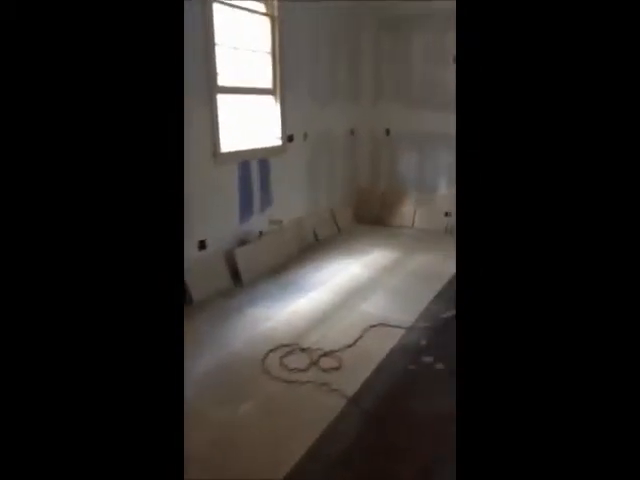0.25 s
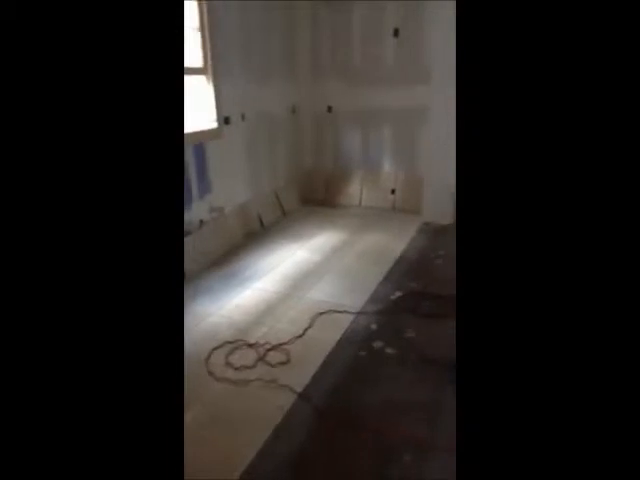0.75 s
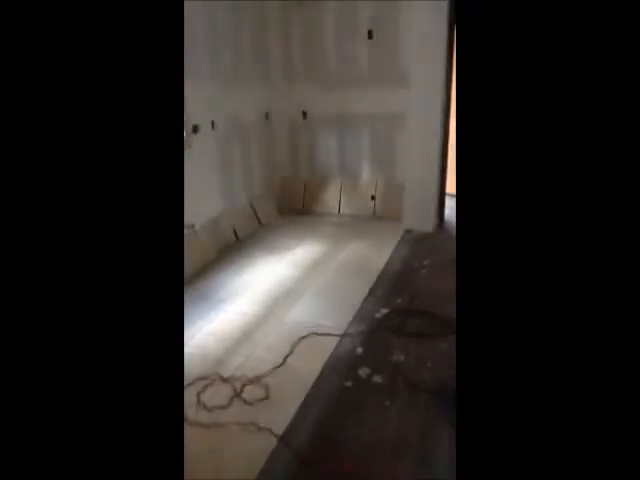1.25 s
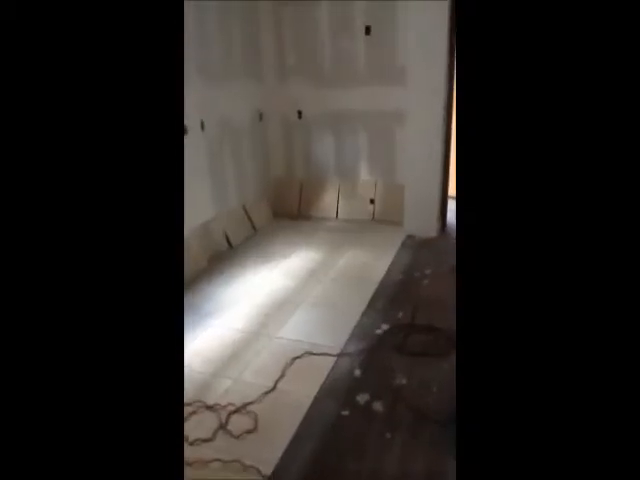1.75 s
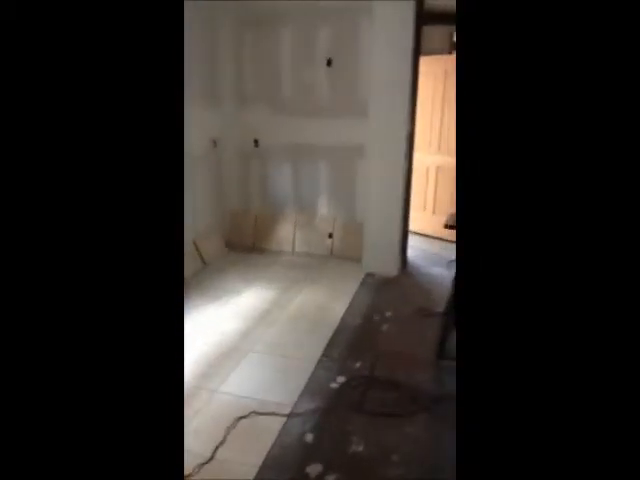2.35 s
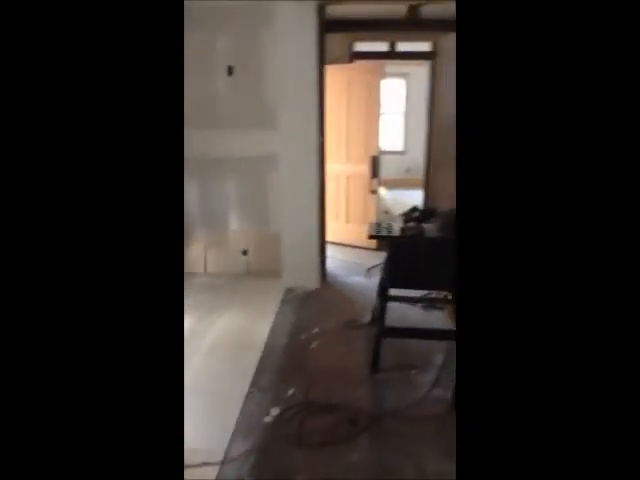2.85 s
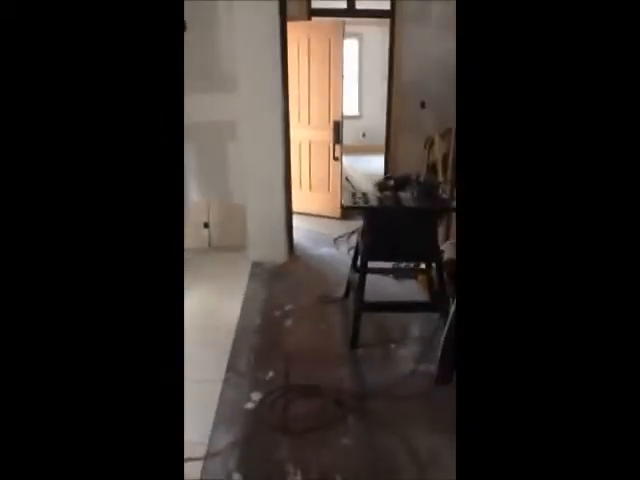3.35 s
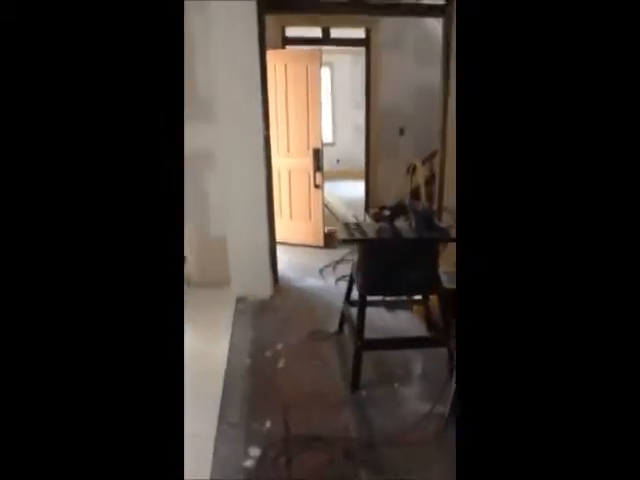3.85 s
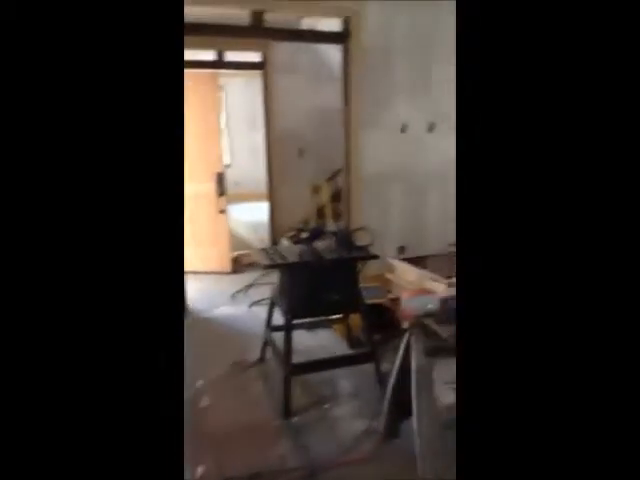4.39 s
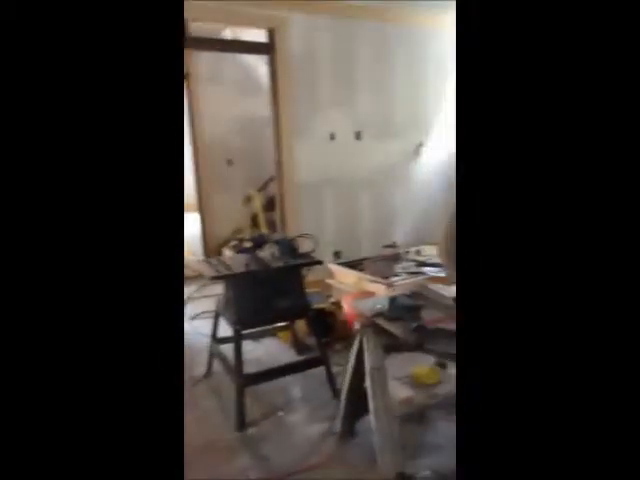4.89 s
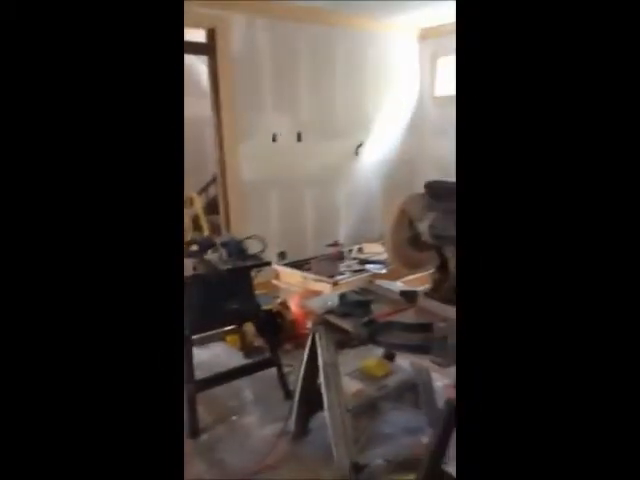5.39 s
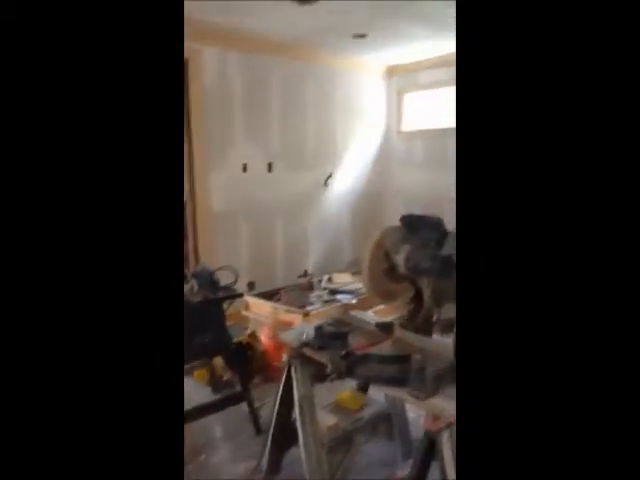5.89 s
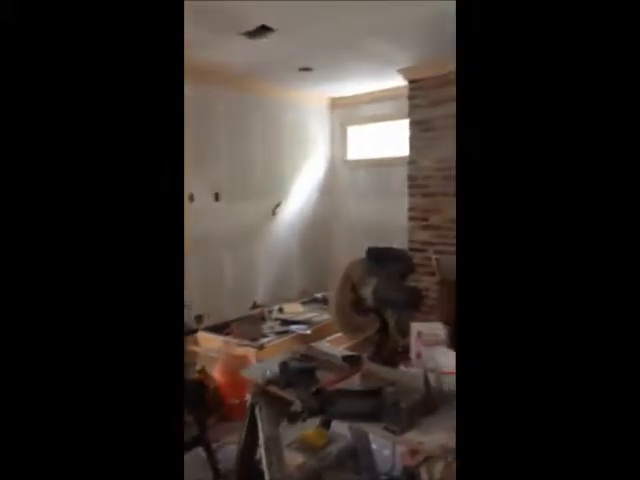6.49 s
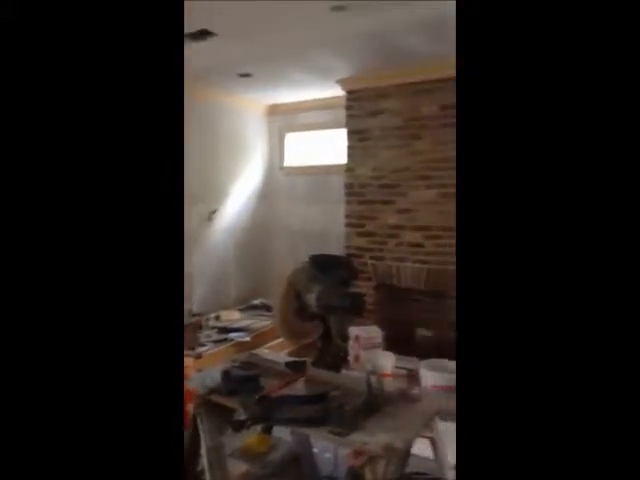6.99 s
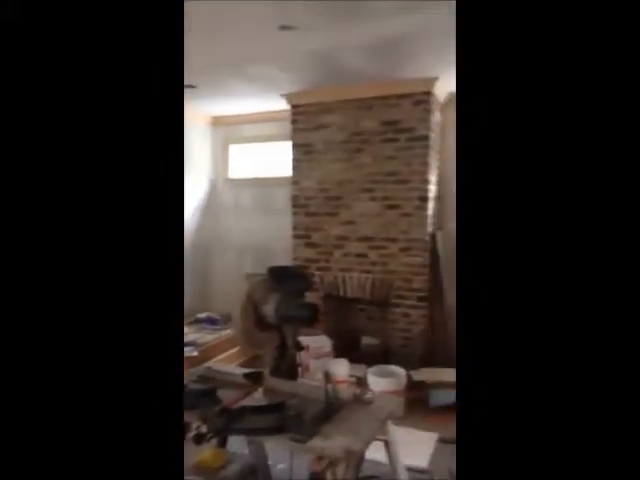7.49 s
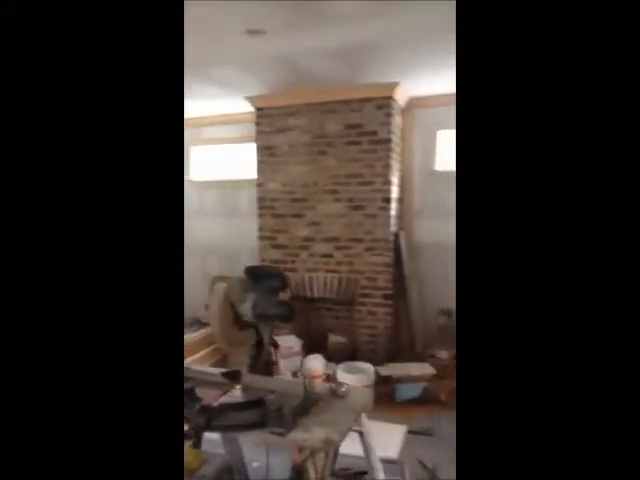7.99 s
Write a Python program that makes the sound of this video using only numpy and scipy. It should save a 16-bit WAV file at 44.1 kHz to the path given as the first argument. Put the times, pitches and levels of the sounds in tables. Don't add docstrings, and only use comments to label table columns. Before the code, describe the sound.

A bare, reverberant room heard through a phone microphone that ducks and slightly overloads on loud hits. From the start a power tool next door gives a soft, airy, geared whir, coasting down and cutting off around 1.6-1.8 s, with a faint drag until 2.3. A heavy hammer blow strikes timber at 0.4 s, a second, glancing one at 0.85. Small steel parts jingle at 1.3, then loose planks knock and bounce from 1.4 to 1.8. A plank topples dully at 2.1; a thin panel slaps with a clank at 2.23. Grit scrapes and a step fall near 2.6. A thin strip cracks brightly and splinters at 3.22. Faint board rocking follows at 3.6 and 4.5. A load drops and bounces at 5.2-5.4. From 5.8 a hollow box bumps, tools rattle weakly, and grit scrapes and snaps until 7.3. A soft step at 7.5, tiny ticks and pings near 8, over low rumble and hiss.

```python
import sys
import numpy as np
from scipy import signal
from scipy.fft import rfft, irfft, next_fast_len
from scipy.io import wavfile
from scipy.ndimage import uniform_filter1d, minimum_filter1d

SR = 44100
rng = np.random.default_rng(int(sys.argv[2]) if len(sys.argv) > 2 else 0)


def field_ratio(decibels):
    return 10 ** (np.asarray(decibels, dtype=float) / 20)


def generate_wav(sig):
    pcm = np.round(np.clip(np.atleast_2d(sig).T, -1, 1) * 32767).astype(np.int16)
    wavfile.write(sys.argv[1], SR, pcm)


N = 363384
SIZE = 45000

# centre_hz, width_hz, level_db
PLANK_MODES = [(265, 93, -3), (373, 160, -0.5), (775, 270, -11.5), (1173, 360, -5)]


def unit(x):
    return x / np.sqrt(np.mean(x ** 2) + 1e-20)


def along(points, hz):
    f, v = np.transpose(points)
    return np.interp(np.log(hz + 1), np.log(f + 1), v)


def coloured(x, gain):
    m = next_fast_len(N + 8192)
    return irfft(rfft(x, m) * gain(np.fft.rfftfreq(m, 1 / SR)), m)[:N]


def humps(modes, hz):
    return np.sqrt(1 + sum(field_ratio(db) ** 2 / (1 + (2 * (hz - c) / w) ** 2) for c, w, db in modes))


def causal(gain):
    cepstrum = irfft(np.log(gain + 1e-6))
    cepstrum[1:SIZE // 2] *= 2
    cepstrum[SIZE // 2 + 1:] = 0
    return np.exp(rfft(cepstrum))


def patchy(x, depth_db):
    z = signal.stft(x, nperseg=512)[2]
    field = uniform_filter1d(rng.standard_normal(z.shape), size=6, axis=0)
    field = uniform_filter1d(field, size=14, axis=1)
    return signal.istft(z * field_ratio(depth_db * unit(field)), nperseg=512)[1][:N]


def tail(seconds=1):
    # pitch_hz, t60_s
    room_decay = [(100, 0.76), (260, 0.43), (700, 0.79), (1840, 0.75), (4850, 0.65), (12800, 0.35)]
    hz, t, z = signal.stft(rng.standard_normal(round(seconds * SR)), SR, nperseg=256)
    fade_db = -60 * t / along(room_decay, hz)[:, None]
    x = signal.istft(z * field_ratio(fade_db), SR, nperseg=256)[1]
    return x / np.linalg.norm(x)


def add(out, s, x):
    part = out[round(s * SR):][:len(x)]
    part += x[:len(part)]


def knocks(rows, modes, note, ring_db, direct_db, wet_db, bass_db, knee_db, early_db, dull_db,
           sharp_ms, soft_ms_per_db):
    out, hz, t = np.zeros(N), np.fft.rfftfreq(SIZE, 1 / SR), np.arange(SIZE) / SR
    wood = humps([(c, w, max(db, -8) + ring_db) for c, w, db in modes], hz)
    note_hz, note_db, note_t60 = note
    hum = field_ratio(note_db - 60 * t / note_t60) * np.sin(2 * np.pi * note_hz * t)
    hum *= 1 - np.exp(-t / 0.0013)
    hardest_db = max(row[1] for row in rows)
    for s, db, mid_db, bright_db in rows:
        sizzle_db = bright_db - dull_db
        slope = [(30, bass_db - 34.0), (100, bass_db), (190, 0.4 * bass_db + 2.0), (280, -1.0),
                 (450, -0.83), (1100, mid_db + 4.0), (2000, (mid_db + bright_db) / 2 + knee_db),
                 (3500, bright_db - 2.5), (9000, sizzle_db - 2.5), (15000, sizzle_db - 7)]
        swell_ms = abs(sharp_ms + soft_ms_per_db * (hardest_db - db))
        answer = field_ratio(wet_db + early_db * np.exp(-t / 0.013)) * np.resize(tail(), SIZE) * (t < 1)
        answer *= 1 - np.exp(-t / (swell_ms / 1000 + 1e-4))
        sight = field_ratio(-2.5 * swell_ms)
        contact = np.abs(rng.standard_normal(64)) ** 3 * np.exp(-t[:64] / .0003)
        answer[:64] += field_ratio(direct_db) * sight * contact / np.linalg.norm(contact)
        blow = irfft(rfft(answer) * causal(wood * field_ratio(along(slope, hz))), SIZE)
        add(out, s + .0016, field_ratio(db) * (blow + sight * hum))
    return out


def hammer():
    # start_s, peak_db, mid_db, bright_db
    blows = [
        (0.381, -16.5, 3, 1),
        (0.387, -1.5, -3.5, -10),
    ]
    # centre_hz, width_hz, level_db
    stud = [(268, 68, 6), (373, 24, 1), (483, 80, -1), (530, 82, -0.5), (622, 15, 1), (695, 35, 3),
            (870, 46, -8), (1116, 43, -2), (1300, 20, -10.5), (1820, 37, -5.5), (1980, 24, -12),
            (2400, 30, -1), (3840, 65, -6), (5450, 72, -24), (8360, 690, 3)]
    return knocks(blows, stud, (280, 0, .15), ring_db=8.0, direct_db=34.0, wet_db=29.5, bass_db=-18.5,
                  knee_db=2.5, early_db=13.0, dull_db=19, sharp_ms=7.9, soft_ms_per_db=0.05)


def glancing_hammer():
    # start_s, peak_db, mid_db, bright_db
    blows = [
        (0.8435, -22.5, -6.5, 1),
        (0.8495, -3.5, -0.5, -10.5),
    ]
    # centre_hz, width_hz, level_db
    post = [(285, 130, 4), (532, 45, 4), (700, 26, -2.5), (947, 40, -6), (1284, 29, -4.5), (1880, 57, -3),
            (2400, 31, -2.5), (3880, 40, 0), (4010, 51, -4), (5420, 270, 0), (8580, 300, 0)]
    return knocks(blows, post, (285, 8, .12), ring_db=7.0, direct_db=9, wet_db=30.0, bass_db=-17.5,
                  knee_db=0.0, early_db=9.5, dull_db=15, sharp_ms=8.9, soft_ms_per_db=-0.2)


def boards():
    # start_s, peak_db, mid_db, bright_db
    landings = [(1.387, -4.5, -2.5, -22.5), (1.399, -8.5, -11.5, -42.5), (1.422, -6.5, -16, -37),
                (1.5095, -6, -3.5, -23), (1.546, -7, -11, -17), (1.564, -11.5, -3.5, -17.5),
                (1.709, -10.5, -15, -19), (1.786, -14, -24, -21.5)]
    return knocks(landings, PLANK_MODES, (388, 5, .14), ring_db=11.0, direct_db=28.5, wet_db=26.5,
                  bass_db=-19.0, knee_db=-1.5, early_db=7.5, dull_db=26.5, sharp_ms=2.5, soft_ms_per_db=1.0)


def toppling_plank():
    # start_s, peak_db, mid_db, bright_db
    hits = [(2.0805, -15.5, 0, -19.5), (2.094, -10, -5.5, -38.5), (2.106, -8.5, -9.5, -37.5)]
    return knocks(hits, PLANK_MODES, (388, 4, .12), ring_db=13.0, direct_db=23.0, wet_db=27, bass_db=-31.0,
                  knee_db=6.5, early_db=4, dull_db=25.0, sharp_ms=2.3, soft_ms_per_db=0.0)


def slapped_panel():
    # start_s, peak_db, mid_db, bright_db
    slaps = [(2.229, -21, 6.5, -6.5), (2.231, -5, -4, -17.5), (2.242, -3.5, -10.5, -26.5),
             (2.259, -11.5, -9, -28.5)]
    # centre_hz, width_hz, level_db
    sheet = [(312, 130, -7.5), (923, 48.5, -12), (1250, 200, -10), (1705, 35, -6.5), (2360, 17, -15),
             (2780, 18, -20), (3040, 19, -19), (3830, 38, -26)]
    return knocks(slaps, sheet, (312, -6, .1), ring_db=9.5, direct_db=24, wet_db=30.5, bass_db=-24.5,
                  knee_db=7.5, early_db=8.5, dull_db=33.5, sharp_ms=2.9, soft_ms_per_db=-1.5)


def cracking_lath():
    # start_s, peak_db, mid_db, bright_db
    cracks = [(3.223, -22, -1, 7.5), (3.228, -21.5, 4.5, -1), (3.27, -10.5, -19.5, -15)]
    # centre_hz, width_hz, level_db
    lath = [(210, 30, 3), (1004, 260, -5.5), (3200, 160, -9), (5200, 60, -14.5), (6780, 56, -2.5),
            (7470, 44, -2.5), (7600, 45, -1.5), (8790, 60, -6), (9600, 90, -7.5), (11200, 60, -8),
            (13420, 200, -10.5)]
    return knocks(cracks, lath, (900, -12, .1), ring_db=8.5, direct_db=34, wet_db=33.5, bass_db=-20.0,
                  knee_db=-1.5, early_db=3.0, dull_db=-0.5, sharp_ms=6.5, soft_ms_per_db=-0.15)


def splinters():
    out, t = np.zeros(N), np.arange(600) / SR
    highpass = signal.butter(2, 2300, "high", fs=SR, output="sos")
    split_s, split_db, gap_s, loss_db, t60_s = 3.2243, -3.5, .0048, 3, .016
    for k in range(4):
        spikes = signal.sosfilt(highpass, rng.standard_normal(len(t)) ** 3)
        level = field_ratio(split_db - loss_db * k - 60 * t / t60_s)
        add(out, split_s + gap_s * k ** 1.3, level * unit(spikes) / 2)
    return out


def dropped_load():
    # start_s, peak_db, mid_db, bright_db
    bounces = [(5.2205, -20.5, -2, -9), (5.2245, -14, -11.5, -15), (5.245, -15, -13.5, -27),
               (5.261, -18, -15, -30), (5.277, -19.5, -11, -32), (5.297, -21, -14, -37),
               (5.367, -16.5, -32, -22), (5.429, -22, -22, -18.5), (5.648, -32, -21, -40)]
    # centre_hz, width_hz, level_db
    joists = [(249, 74, -8), (478, 79, -8.5), (720, 20, -7), (1307, 14, -11), (1530, 44, -12),
              (1780, 57, -14), (1990, 29, -14), (2300, 64, -14), (2600, 89, -16), (3750, 63, -21)]
    return knocks(bounces, joists, (250, -3, .1), ring_db=13.5, direct_db=27.5, wet_db=31.5, bass_db=-3,
                  knee_db=0.5, early_db=6.0, dull_db=16, sharp_ms=2.8, soft_ms_per_db=1.5)


def crate():
    # start_s, peak_db, mid_db, bright_db
    handling = [(4.149, -38, -16.5, -5.5), (5.784, -29.5, -4.5, -11.5), (5.849, -29, -15, -32),
                (5.97, -31.5, -5.5, -12.5), (5.983, -29.5, -16, -31), (6.052, -28.5, -15.5, -22),
                (6.089, -31.5, -10, -21), (6.179, -30.5, -14, -19), (6.499, -36, -6, -7),
                (6.945, -32.5, -26, -29)]
    # centre_hz, width_hz, level_db
    box = [(210, 200, -12.5), (506, 79, -1), (960, 96, -4), (1620, 120, -10), (2240, 37, -13),
           (2850, 55, -8), (3580, 45, -5), (4100, 98, -6.5)]
    return knocks(handling, box, (504, 0, .12), ring_db=11, direct_db=31.5, wet_db=31.5, bass_db=-9.5,
                  knee_db=2.0, early_db=10.5, dull_db=7.5, sharp_ms=3.3, soft_ms_per_db=1.7)


def footsteps():
    # start_s, peak_db, mid_db, bright_db
    steps = [(2.626, -24.5, -5, -26), (2.641, -22.5, -13, -30), (3.152, -24, 2, 1.5), (3.749, -49, -6, 4),
             (3.799, -46.5, 2, -1), (4.549, -47, -15, 1.5), (4.639, -51, -5, -11), (7.506, -34.5, 0, -4.5),
             (7.549, -34, 2.5, -7.5), (7.619, -55, -26, -19)]
    # centre_hz, width_hz, level_db
    deck = [(147, 22, 4), (210, 32, 6), (323, 67, 2.5), (500, 163, -3), (730, 56, -28.5)]
    return knocks(steps, deck, (250, 0, .1), ring_db=16.0, direct_db=28, wet_db=26.5, bass_db=-18.0,
                  knee_db=1.0, early_db=6, dull_db=13.5, sharp_ms=7.5, soft_ms_per_db=0.0)


def bumps():
    # start_s,
    # peak_db, pitch_hz, t60_s
    singles = [(0.01, -40, 312, 0.17), (5.72, -45, 242, 0.24), (5.787, -28.5, 354, 0.067),
               (5.87, -40, 500, 0.19), (6.049, -33, 210, 0.18), (6.12, -49, 528, 0.27),
               (6.20, -44, 510, 0.14), (6.25, -40, 517, 0.087), (0.833, -27, 350, .05),
               (0.851, -9, 285, 0.078), (0.854, -9.5, 520, 0.052), (4.134, -48, 500, .1),
               (4.2, -52, 510, .1), (2.262, -12, 375, .09), (2.242, -8.5, 304, 0.037),
               (6.072, -36, 330, 0.032), (6.092, -33, 323, .04), (6.425, -39, 1073, .08),
               (6.486, -35, 887, .05), (6.516, -43, 350, .1), (6.525, -38, 798, 0.089),
               (6.583, -42, 440, .08)]
    # start_s, peak_db, first_hz, last_hz, gap_s
    rocking = [(3.619, -26.5, 335, 243, 0.016), (4.493, -33.5, 199, 244, .022)]
    out, t = np.zeros(N), np.arange(SR // 5) / SR
    loss_db, rock_t60_s = 1.5, 0.032
    rocks = [(s + k * gap, db - k * loss_db, first + (last - first) * k / 4, rock_t60_s)
             for s, db, first, last, gap in rocking for k in range(5)]
    for s, db, hz, t60 in singles + rocks:
        note = field_ratio(-60 * t / t60) * np.sin(2 * np.pi * hz * t) * (1 - np.exp(-t / 0.0015)) ** 2
        wet = field_ratio(-0.5) * signal.fftconvolve(note, tail(.7))
        add(wet, 0, note)
        add(out, s, field_ratio(db + 2) * wet)
    return out


def clicks():
    # start_s, peak_db, pitch_hz, t60_s
    contacts = [(0.382, -27, 8200, .04), (1.3874, -12, 2500, 0.012), (3.2265, -8.5, 3300, 0.011),
                (4.152, -43, 4000, .02), (5.36, -42, 3700, .015), (7.953, -53.5, 3500, .04),
                (1.399, -37, 4200, .012), (1.5118, -7, 900, 0.025), (1.55, -36, 4200, .01),
                (1.565, -33.5, 4200, .01), (2.2291, -12, 1620, 0.032), (2.237, -38, 3800, .012),
                (2.241, -27, 4200, .012), (5.784, -37, 5500, .02), (5.9705, -36, 1800, .02),
                (0.845, -28, 5000, .03), (2.0815, -22, 1800, .015), (6.505, -38, 2800, .03),
                (6.875, -43, 4500, .03), (7.12, -44, 4500, .04), (1.399, -8, 400, 0.032),
                (2.6, -39, 1500, .015)]
    out, t = np.zeros(N), np.arange(1500) / SR
    for s, db, hz, t60 in contacts:
        band = signal.butter(2, [hz * .7, hz * 1.13], "band", fs=SR, output="sos")
        burst = unit(signal.sosfilt(band, rng.standard_normal(len(t))))
        add(out, s, field_ratio(db - 4.5 - 60 * t / t60) * burst)
    return out


def steel(rows, modes, gain_db, wet_db, hiss_db, tremble=.25):
    out, t = np.zeros(N), np.arange(SR // 2) / SR
    hz, level_db, t60 = np.transpose(modes)[:, :, None]
    for s, db in rows:
        strength, tune = rng.standard_normal((2, len(modes), 1))
        shake = np.cumsum(rng.standard_normal((len(modes), len(t) // 50)), axis=1).repeat(50, axis=1)
        phase = 2 * np.pi * hz * (1 + .0016 * tune) * t + tremble * shake
        ring = (field_ratio(level_db + 2.5 * strength - 60 * t / t60) * np.sin(phase)).sum(axis=0)
        hiss = field_ratio(hiss_db - 60 * t / 0.034) * np.diff(rng.standard_normal(len(t) + 1))
        ring = (ring + hiss) * (1 - np.exp(-t / 0.0018))
        wet = field_ratio(wet_db) * signal.fftconvolve(ring, tail(0.54))
        add(wet, 0, ring)
        add(out, s, field_ratio(db + gain_db) * wet)
    return out


def jingling_parts():
    # start_s, peak_db
    jumps = [(1.2764, -27), (1.293, -24), (1.3194, -41.5)]
    # pitch_hz, level_db, t60_s
    loose = [(6570, -10.5, 0.0575), (7180, -5, .1), (8680, -6.5, 0.084), (9065, -12.5, .08),
             (9650, -18.5, .12), (10830, -18.5, .06), (12150, -15, .08), (12550, -8.5, .08),
             (13800, -17, .08), (14200, -8.5, .08), (14560, 0, .08), (14650, -5, .08), (14800, -6, 0.0974),
             (15000, -8.5, .05)]
    # start_s, peak_db
    landings = [(1.4194, -40.5), (1.4964, -29), (1.5179, -27.5), (1.5494, -46)]
    # pitch_hz, level_db, t60_s
    settled = [(6840, -27, .08), (7160, -11, .1), (8940, -14, .08), (9780, -17, .08), (11080, -12, .08),
               (11900, -14, .1), (13490, -13, 0.047), (13830, -6.5, .12), (14100, -4, .12),
               (14240, -3, .12)]
    jingle = steel(jumps, loose, gain_db=-17.5, wet_db=8.0, hiss_db=0)
    return jingle + steel(landings, settled, gain_db=-11.0, wet_db=2.5, hiss_db=-14)


def hammer_head():
    # start_s, peak_db
    clank = [(2.2325, -20)]
    # pitch_hz, level_db, t60_s
    head = [(2632, 0, .15), (3090, 0, .06), (3510, -8, .2), (3842, 2, .9), (4100, -10, .3), (4931, -14, .2),
            (5394, -4.5, .5), (6300, -12, .3), (7817, -10.5, .17), (8900, -22, .08)]
    return steel(clank, head, gain_db=-26, wet_db=-2, hiss_db=-14, tremble=.06)


def toolbox():
    # start_s, peak_db
    jolts = [(5.785, -50), (5.83, -55)]
    # pitch_hz, level_db, t60_s
    iron = [(1870, -3, 0.091), (2210, -4, .1), (2950, 3, .2), (3060, -1.5, 0.17), (4940, -10, .1),
            (5470, -2, .12), (5870, -9, .08), (8060, 0, 0.11), (8190, -5, .08)]
    # start_s, peak_db
    shifts = [(5.972, -55), (6.0, -61), (6.052, -55), (6.10, -56), (6.16, -58)]
    # pitch_hz, level_db, t60_s
    wire = [(1655, 1, .12), (1900, 5, .12), (2240, -3, .12), (2660, -2, .18), (3000, -8, .1),
            (3620, -5, 0.16), (4180, -8, .12), (4480, -10, .1), (6120, -13, .08)]
    jolting = steel(jolts, iron, gain_db=-3, wet_db=0, hiss_db=-20)
    return jolting + steel(shifts, wire, gain_db=-3, wet_db=4, hiss_db=-20)


def pings():
    # start_s, peak_db, pitch_hz, t60_s
    hits = [(7.257, -43.5, 1980, 0.057), (7.95, -62, 2560, 0.13), (8.03, -61.5, 2600, .1),
            (8.055, -61, 2680, 0.093), (8.17, -70, 2500, .08), (4.565, -62, 1900, .08)]
    out = np.zeros(N)
    for s, db, hz, t60 in hits:
        out += steel([(s, db)], [(hz, 0, t60)], gain_db=5.5, wet_db=-4, hiss_db=-30, tremble=.08)
    return out


def scrape():
    # start_s, length_s, level_db, sizzle_db, rumble_db
    strokes = [(1.268, .09, -47, 4.5, -25), (4.499, .04, -59.5, 6, -18), (2.561, 0.23, -50.5, -4, 7),
               (4.127, 0.036, -55, 1, -3), (6.266, 0.28, -47, 0, -5.5), (6.417, 0.037, -51.5, -16, 7),
               (6.475, 0.12, -49.5, -2.5, 4), (6.597, 0.15, -56.5, 5.5, 2), (6.764, 0.25, -53.5, -0.5, 0),
               (7.027, 0.15, -54.5, 1.5, -0.5), (7.25, 0.045, -44, 4, -3), (7.282, 0.048, -40, 5.5, -4)]
    # pitch_hz, level_db per Hz
    grit = [(88, -20), (150, -5.5), (285, -2.5), (352, 2), (396, -3), (844, -6.5), (930, -6),
            (10900, -24.5), (15500, -29)]
    t = np.arange(N) / SR
    grains = rng.standard_normal(N) * field_ratio(2.0 * np.minimum(rng.exponential(size=N), 4))
    grains *= rng.random(N) < .15

    def above(hz, edge_hz):
        return 1 / np.sqrt(1 + (edge_hz / (hz + 1)) ** 6)

    def below(hz, edge_hz):
        return 1 / np.sqrt(1 + (hz / edge_hz) ** 6)

    heavy = unit(coloured(grains, lambda hz: field_ratio(along(grit, hz)) * below(hz, 928)))
    dull = unit(coloured(grains, lambda hz: field_ratio(along(grit, hz)) * above(hz, 1280) * below(hz, 5300)))
    sharp = unit(coloured(grains, lambda hz: field_ratio(along(grit, hz)) * above(hz, 7600)))
    grip_s, sag_db, dulls_db, lift_db_per_s = 0.027, 5, 9, 161
    direct = np.zeros(N)
    for s, length, db, sizzle_db, rumble_db in strokes:
        done = np.clip((t - s) / length, 0, 1)
        lift_db = lift_db_per_s * np.maximum(t - s - length, 0)
        level = np.clip((t - s) / grip_s, 0, 1) * field_ratio(db - sag_db * done - lift_db)
        direct += level * (dull + field_ratio(sizzle_db - dulls_db * done) * sharp + field_ratio(rumble_db) * heavy)
    return direct + field_ratio(-3) * signal.fftconvolve(direct, tail())[:N]


def snaps():
    # start_s, peak_db, pitch_hz
    ticks = [(0.858, -24, 4730), (1.389, -20, 2400), (5.221, -24, 2700), (5.365, -40, 3200),
             (5.429, -34, 4350), (6.446, -32, 9000), (6.56, -38, 9000), (6.619, -33, 6940),
             (6.62, -21.5, 2300), (5.971, -32, 2500), (6.81, -48, 11000), (6.87, -35, 5900),
             (7.705, -46, 6000), (7.885, -49, 8500), (7.956, -43.5, 3580)]
    out = np.zeros(N)
    for s, db, hz in ticks:
        b, a = signal.butter(1, [hz * 1.0, min(hz * 1.37, 15e3)], "band", fs=SR)
        wet = field_ratio(19) * tail(.7)
        wet[:300] += 0.78 * rng.standard_normal(300) * np.linspace(1, 0, 300)
        add(out, s, field_ratio(db) * signal.lfilter(b, a, wet))
    return out


def tool():
    # pitch_hz, level_db per Hz
    air_spectrum = [(59, -52), (100, -22.5), (146, -4), (192, -17.5), (313, -9), (340, -8), (564, -6.5),
                    (1180, -4), (1550, -5), (2370, -5), (2990, -3.5), (6390, -4), (9150, -17), (10800, -20),
                    (15500, -29)]
    # centre_hz, width_hz, level_db
    housing = [(2500, 280, -1.5), (3525, 200, 1), (4030, 230, 1.5), (4980, 92, 4), (6300, 170, -1.5),
               (7200, 540, 0), (10600, 500, 6), (11230, 313, 4)]
    t = np.arange(N) / SR
    shaft_hz = 193 * np.exp(-t / 6)
    turns = np.cumsum(shaft_hz) / SR
    air = patchy(rng.standard_normal(N), depth_db=1.56) * (1 + 0.1 * np.sin(2 * np.pi * turns))
    case = [(c, w, db + 1.5) for c, w, db in housing]
    noise = unit(coloured(air, lambda hz: field_ratio(along(air_spectrum, hz)) * humps(case, hz)))
    whine = coloured(noise, lambda hz: 1 / (1 + (7800 / (hz + 1)) ** 12))
    noise = noise - whine * (1 - field_ratio(3 - 4.5 * t))
    start_db, coast_db_per_s, brake_s, brake_db_per_s = -37.5, 8.5, 1.58, 63
    drag_db, halt_s = -61, 2.3
    level_db = start_db - coast_db_per_s * t - brake_db_per_s * np.maximum(t - brake_s, 0)
    return field_ratio(np.maximum(level_db, drag_db) + 3) * (t < halt_s) * noise


def floor():
    # pitch_hz, level_db per Hz
    background = [(41, -58), (70, -13.5), (207, -0.5), (381, -4), (641, -5.5), (701, -7.5), (840, -7),
                  (1230, -10.5), (2380, -15.5), (2600, -15.5), (2850, -16.5), (15500, -24.5)]
    noise = patchy(rng.standard_normal(N), depth_db=.8)
    return field_ratio(-56.5) * unit(coloured(noise, lambda hz: field_ratio(along(background, hz))))


def scene():
    wood = hammer() + glancing_hammer() + boards() + toppling_plank() + slapped_panel()
    wood += cracking_lath() + splinters() + dropped_load() + crate() + footsteps()
    contacts = bumps() + clicks()
    metal = jingling_parts() + hammer_head() + toolbox() + pings()
    grit = scrape() + snaps()
    return (wood + contacts + metal + grit + tool() + floor())[None]


def top_cut(x):
    return signal.sosfilt(signal.butter(12, 16560, fs=SR, output="sos"), x)


def record(dry):
    x = signal.sosfilt(signal.butter(3, 100, "high", fs=SR, output="sos"), dry[0])
    loud = np.sqrt(np.abs(uniform_filter1d(x ** 2, size=256)))
    duck = np.minimum(1, (field_ratio(-10.5) / (loud + 1e-9)) ** 0.3)
    x = x * uniform_filter1d(minimum_filter1d(duck, size=1500, origin=600), size=400)
    x = x + .03 * x ** 2
    x = x / (1 + np.abs(x) ** 6) ** (1 / 6)
    top_hz = 15500
    x = coloured(x, lambda hz: (hz > 12) / (1 + np.exp(np.clip((hz - top_hz) / 70, -50, 50))))
    return top_cut(x)


dry = scene()
out = record(dry)
generate_wav(out)
```